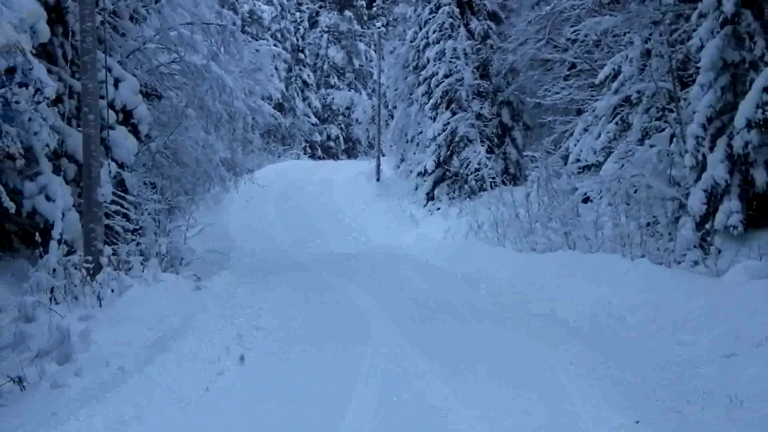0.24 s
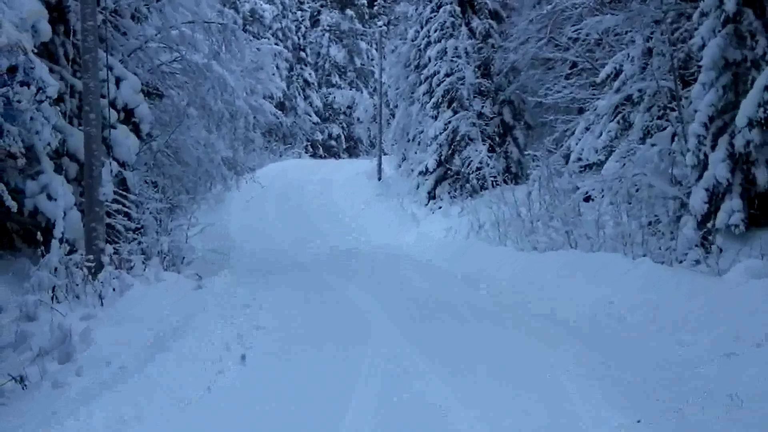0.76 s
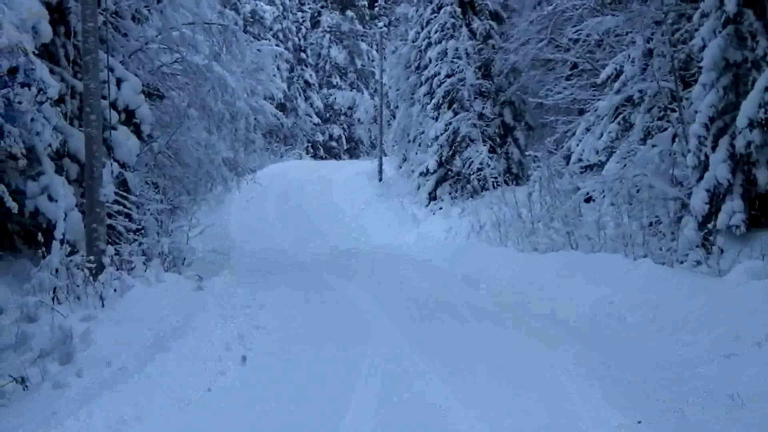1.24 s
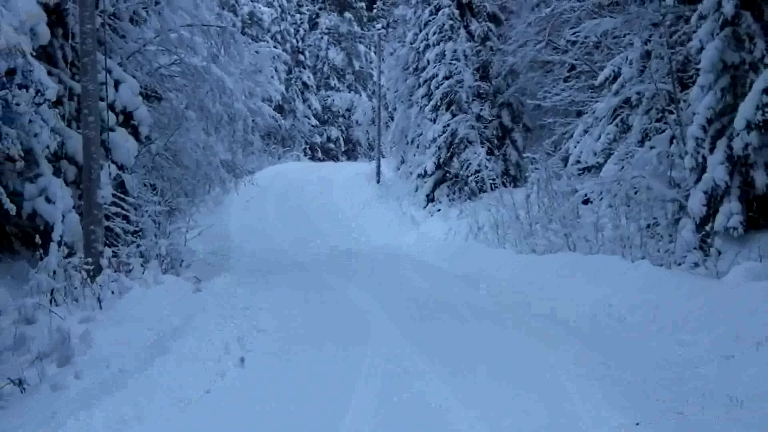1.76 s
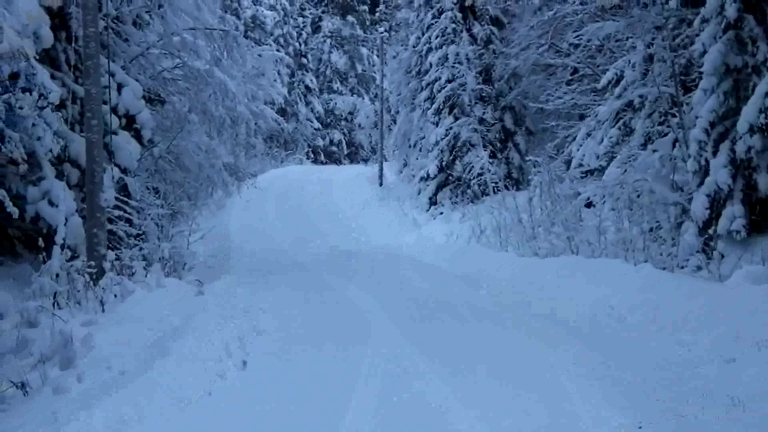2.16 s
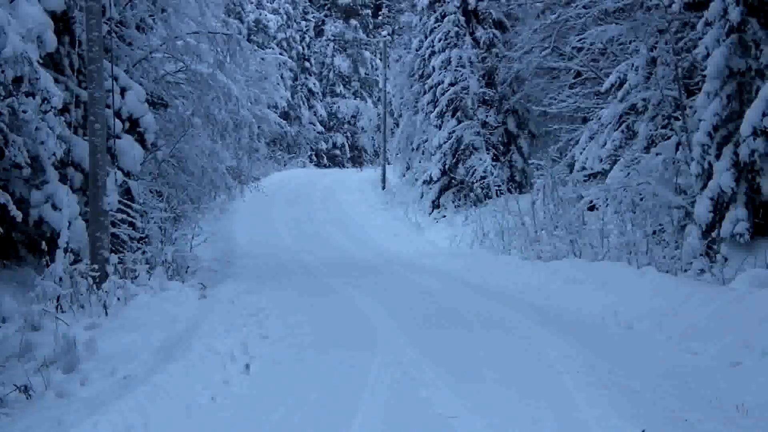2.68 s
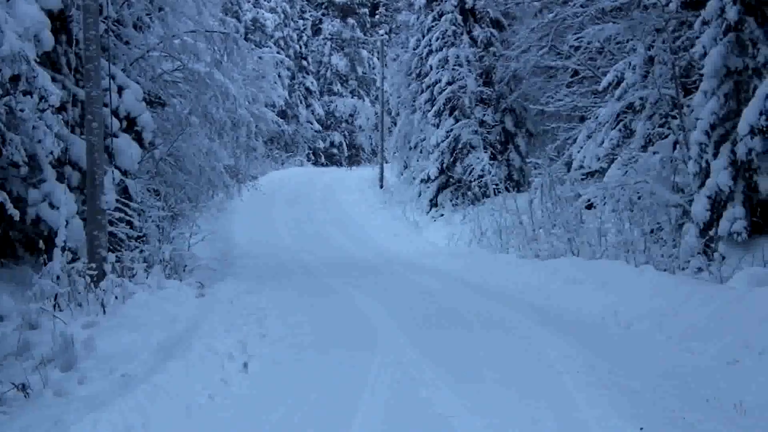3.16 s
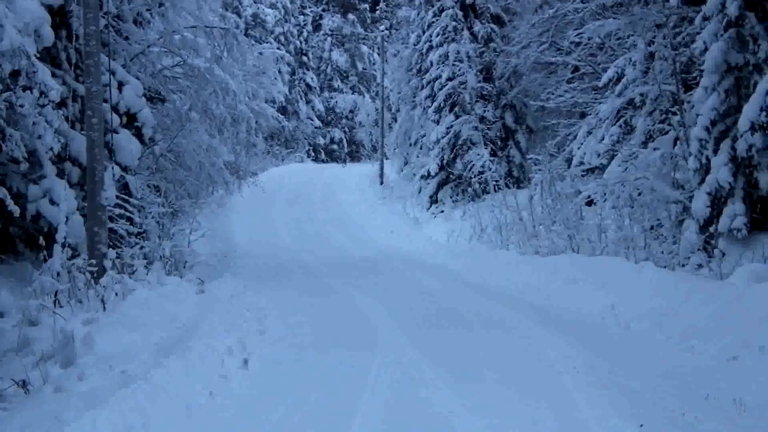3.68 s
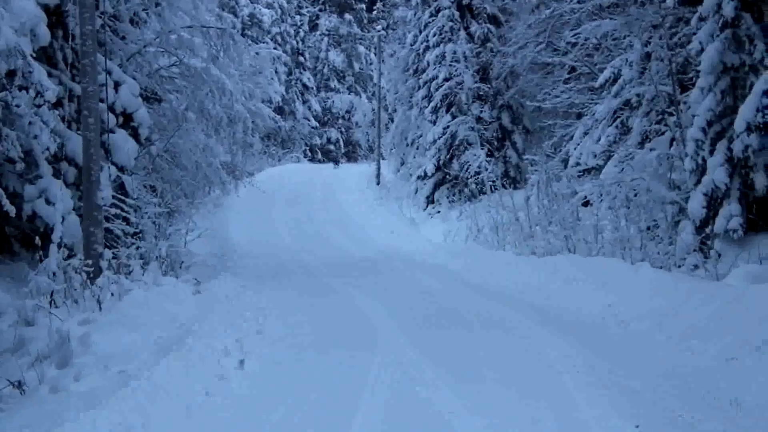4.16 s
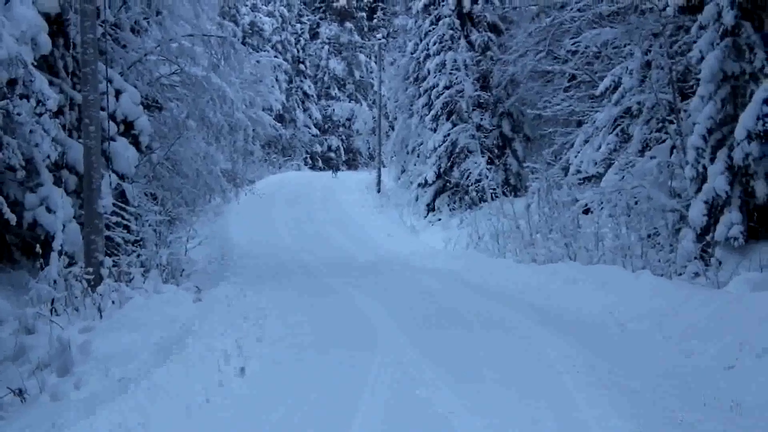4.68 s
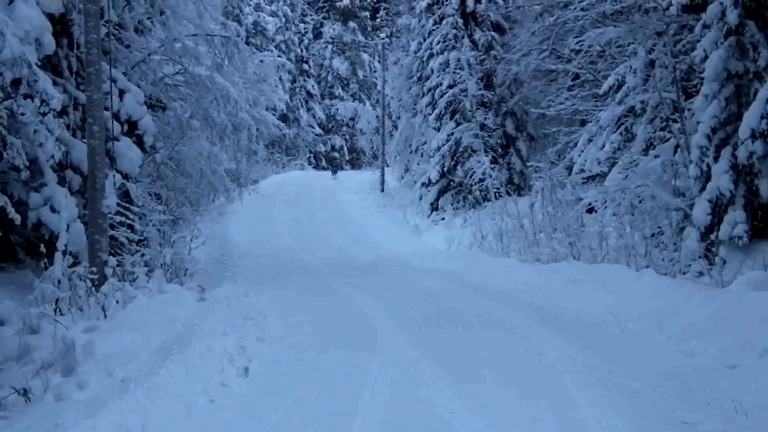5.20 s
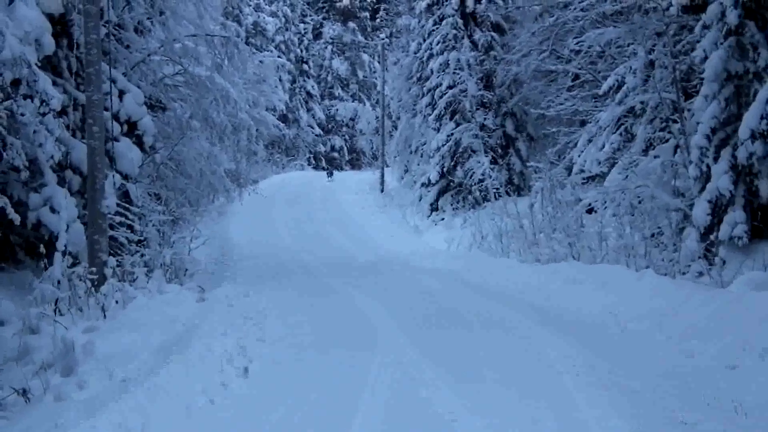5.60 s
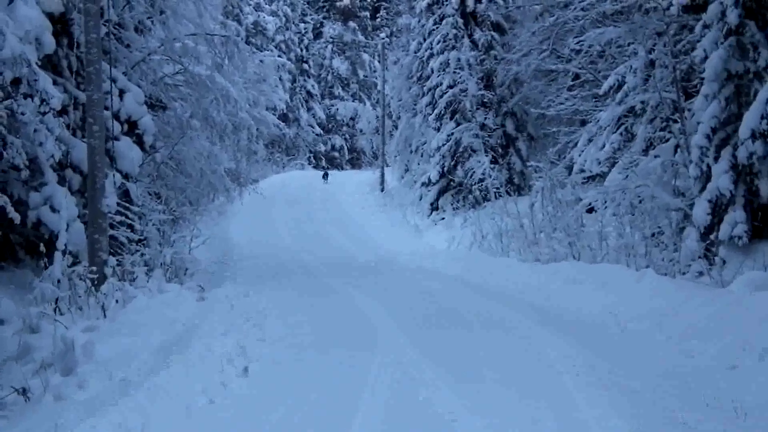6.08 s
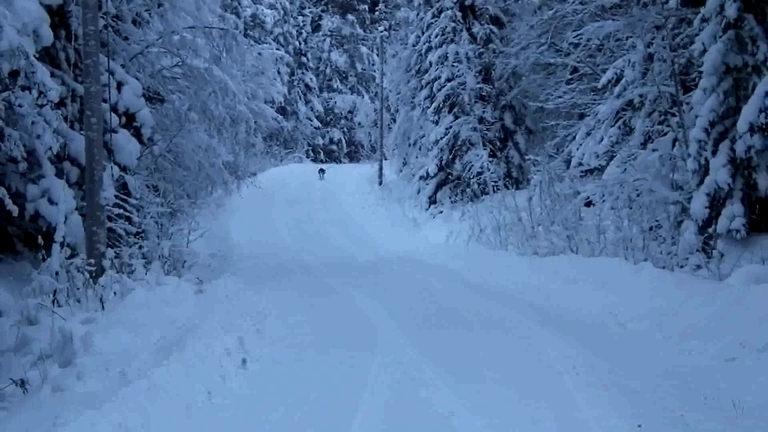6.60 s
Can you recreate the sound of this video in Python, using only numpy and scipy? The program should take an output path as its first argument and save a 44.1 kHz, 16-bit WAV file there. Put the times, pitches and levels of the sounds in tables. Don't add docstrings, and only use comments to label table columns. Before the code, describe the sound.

A running hound yelps high and short, roughly twice a second in clusters: five cries, a gap of over a second, three louder ones, then one at the end. Hoarse pants, throat clicks and faint nasal whistles fill in between. The snowy woods return only a short dull tail. Early wind buffets the left of the stereo camera microphone, fading to faint gusts over air noise, hiss, ticking and whirring.

```python
import sys
import numpy as np
from scipy import signal
from scipy.fft import rfft, irfft
from scipy.io import wavfile
from scipy.ndimage import uniform_filter1d

SR = 44100
rng = np.random.default_rng(int(sys.argv[2]) if len(sys.argv) > 2 else 0)


def master_out(mix):
    frames = np.transpose(np.atleast_2d(mix))
    ceiling = np.clip(frames, -1, 1)
    pcm = np.round(ceiling * 32767).astype(np.int16)
    wavfile.write(sys.argv[1], SR, pcm)


def linear_from_db(decibels):
    return 10 ** (np.asarray(decibels, float) / 20)


N = 301644
TIME = np.arange(N) / SR

# (frequency [Hz], density [dB per Hz])
AIR_SPECTRUM = [(12, -31), (20, 5.5), (123, -9.5), (334, -5.5), (461, -8), (654, -6), (950, -8.5),
                (1530, -10), (1640, -10.5), (1860, -6.5), (2110, -11), (6000, -12), (7700, -22.5),
                (10000, -53), (16900, -120)]
# (frequency [Hz], density [dB per Hz])
HISS_SPECTRUM = [(7500, -41), (8100, -28), (8400, 12.5), (8700, -5), (9100, -4), (9600, -4), (10300, 3.5),
                 (11000, -1.5), (11600, -12), (12100, -5), (15300, 1)]
# (time [s], gain [dB])
CAMERA_GAIN = [(0, 5.5), (.66, 3.5), (3.6, 1.77), (6.84, 0.8)]
# (start [s], length [s], level [dB])
DRONE_PASS = (3.584, 0.63, -54.5)
WHIR_STARTS = [0.059, 1.06, 2.06, 3.059, 5.06, 6.06]
# (from [Hz], to [Hz])
EMPTY_BANDS = [(7730, 8050), (8680, 8970), (11690, 11780), (15170, 22050)]

# (frequency [Hz], density [dB per Hz])
GUST_SPECTRUM = [(25, -14), (50, -1), (85, 0), (150, -7), (250, -19), (450, -30), (600, -60)]
# (start [s], length [s], level [dB], left minus right [dB])
GUST_EVENTS = [(-.1, 0.38, -31, 39), (0.255, 0.11, -33, 36), (0.356, 0.24, -26, 27),
               (0.623, 0.034, -28.5, 30), (0.906, 0.035, -34, 29), (1.602, 0.23, -55, 29),
               (2.295, 0.2, -45.5, 9), (2.472, 0.38, -40.5, 17), (3.562, 0.089, -46, 20),
               (4.367, 0.43, -51.5, 19), (4.8, 0.38, -43, 24), (5.163, 0.33, -44.5, 16),
               (5.426, 0.32, -46, 5), (5.837, 0.1, -53, 24), (5.997, 0.38, -45, -22),
               (6.656, 0.32, -71, -4)]
# (time [s], level [dB])
BREEZE = [(0, -27.5), (.7, -49), (2.9, -60.5), (3.4, -85), (6.3, -65), (6.55, -83), (6.84, -86)]
# (time [s], peak [dB], frequency [Hz])
EDDIES = [(0.019, -17, 68), (0.04, -18.5, 151), (0.063, -18.5, 176), (0.075, -12.5, 126), (0.124, -16, 93),
          (0.142, -16, 28), (0.192, -14, 108), (0.206, -21, 90), (0.282, -17, 92), (0.29, -43, 138),
          (0.309, -9.5, 71), (0.386, -24, 113), (0.411, -13, 119), (0.417, -27, 126), (0.465, -24, 149),
          (0.508, -20, 81), (0.543, -11.5, 118), (0.569, -14, 80), (0.923, -21, 30), (2.533, -24.5, 45),
          (2.541, -28, 256), (2.609, -30, 69), (2.63, -22.5, 92), (2.641, -20, 57), (2.672, -25, 50),
          (2.713, -34, 59), (2.727, -36, 85), (2.737, -37, 131), (2.781, -27, 64), (2.797, -33, 70),
          (4.867, -22.5, 83), (5.037, -29, 62), (5.32, -29, 71), (5.602, -34, 106), (5.904, -28, 111)]

# (frequency [Hz], width [Hz], level [dB])
THROAT_MODES = [(850, 150, -3.5), (1620, 390, 13), (2000, 2030, 1)]
# (frequency [Hz], width [Hz], level [dB])
MUZZLE_MODES = [(4190, 930, 1.5), (6760, 850, -2)]
# (time [s], frequency [Hz], peak
# [dB], length [s])
SHORT_TONES = [(0.679, 1440, -9.5, 0.0047), (0.755, 1600, -36, .02), (0.83, 1610, -45, 0.019),
               (0.874, 1620, -50, 0.036), (1.209, 2052, -19.5, 0.0048), (1.214, 2070, -20, 0.0076),
               (2.66, 1450, -20, 0.021), (2.671, 1418, -7.5, 0.012), (2.672, 2780, -35, .008),
               (2.083, 4760, -32, .012), (2.093, 4800, -34, .01), (4.211, 990, -20, 0.0099),
               (2.733, 1430, -32.5, 0.018), (4.19, 4220, -27, .014), (4.666, 2150, -23.5, .014),
               (4.773, 4450, -27.5, 0.014), (6.22, 850, -43, .008), (6.27, 820, -45, 0.016),
               (0.683, 2200, -22.5, 0.0058), (0.69, 1600, -18.5, 0.016), (0.702, 1620, -21, 0.014),
               (0.733, 1620, -27.5, 0.021), (1.612, 998, -15, 0.024), (1.488, 1710, -24, 0.0047),
               (2.108, 1183, -17, 0.0024), (2.119, 1900, -22, 0.0029), (2.130, 1700, -34, 0.0032),
               (2.684, 1490, -22, 0.011), (5.334, 2050, -22, .006), (5.345, 2300, -27, .012),
               (5.355, 2400, -29, .01), (5.368, 2450, -33, .012), (5.379, 2400, -34, .01),
               (5.378, 1750, -33, .01), (6.226, 1500, -32, .005), (6.231, 900, -32, .004),
               (5.365, 3600, -34, .008), (6.198, 3620, -33, .006), (6.203, 6100, -42, .006),
               (6.212, 1300, -34, .003), (6.220, 1450, -25, .004), (6.23, 1400, -48, 0.0051),
               (6.265, 1170, -32, 0.0024), (6.784, 1600, -16, 0.0082), (6.789, 1723, -13, .006)]
RASP_STARTS = [.685, 1.296, 1.615, 2.1, 2.678, 4.195, 4.782, 5.327, 5.4, 5.705, 6.208, 6.259, 6.315, 6.785,
               5.74, 5.835]
# (length [s], level [dB], mouth [Hz], brightness [dB])
RASP_BREATHS = [(0.066, -38.5, 750, -12), (0.067, -33.5, 800, -24), (0.049, -32, 470, -22),
                (0.055, -35.5, 664, -13), (0.08, -34.5, 510, -21), (0.075, -29, 900, -12.5),
                (0.048, -29.5, 810, -10), (0.06, -28.5, 1650, -13), (0.049, -40, 1620, -20),
                (0.14, -40.5, 1550, -15.5), (0.054, -44, 370, -3.5), (0.036, -48, 600, -7),
                (0.077, -43, 470, -5.5), (0.093, -27, 1480, -14), (0.048, -41.5, 2000, -16),
                (0.015, -43, 1500, -21)]
# (start [s], length [s], from [Hz], to [Hz], level [dB])
NOSE_WHISTLES = [(3.219, .026, 6340, 5800, -61), (4.04, 0.034, 3310, 4720, -53.5),
                 (4.328, 0.062, 2850, 2710, -62.5), (4.617, 0.02, 3580, 4700, -52.5),
                 (5.1, 0.065, 2980, 3140, -61), (5.192, 0.021, 3630, 5030, -50),
                 (6.141, 0.025, 2820, 3590, -50.5), (6.157, 0.024, 3800, 4100, -59),
                 (6.185, 0.0096, 3720, 3664, -54), (6.579, 0.03, 3120, 2920, -58),
                 (6.613, 0.022, 3100, 3170, -55), (6.645, 0.0085, 3140, 3450, -51.5),
                 (6.659, 0.011, 3880, 4150, -51.5), (5.673, 0.022, 6220, 5280, -60)]

# (time [s], pitch [Hz], effort [dB])
CRY_CURVES = [
    [(.61, 1659, -45), (.618, 1634, -23.5), (.629, 1584, -33), (.645, 1583, -21), (.667, 1675, -17),
     (.676, 1600, -20), (.685, 1137, -28.5), (.695, 850, -46), (.708, 650, -40)],
    [(1.202, 2181, -33), (1.217, 1730, -27.5), (1.232, 1500, -19), (1.261, 1433, -13.5),
     (1.269, 1507, -20.5), (1.278, 1420, -30.5), (1.297, 1425, -38), (1.304, 850, -27), (1.315, 720, -32.5)],
    [(1.464, 561, -34.5), (1.495, 910, -33), (1.501, 1004, -19), (1.52, 1102, -14.5), (1.541, 1063, -12),
     (1.547, 1068, -28.5), (1.57, 1235, -26), (1.6, 1170, -37.5), (1.618, 813, -25.5)],
    [(1.994, 2058, -44), (2.002, 1707, -25), (2.014, 1485, -30), (2.036, 1350, -21), (2.054, 1403, -30.5),
     (2.072, 1464, -22), (2.079, 1559, -34), (2.1, 1345, -35.5), (2.118, 750, -33.5)],
    [(2.573, 2250, -48), (2.582, 1850, -23.5), (2.593, 1600, -27.5), (2.612, 1529, -18), (2.629, 1531, -16),
     (2.645, 1649, -31), (2.666, 1781, -38), (2.686, 793, -25), (2.696, 659, -80)],
    [(4.091, 1780, -31), (4.099, 1530, -18), (4.11, 1420, -15.5), (4.124, 1397, -17.5), (4.171, 1412, -6.5),
     (4.182, 1435, -9.5), (4.19, 1320, -25), (4.2, 960, -20), (4.205, 940, -40)],
    [(4.65, 918, -25), (4.668, 1086, -35), (4.677, 1243, -23), (4.701, 1259, -15), (4.709, 1294, -18),
     (4.713, 1421, -16), (4.763, 1487, -20.5), (4.777, 1092, -25.5), (4.788, 660, -32.5)],
    [(5.229, 2336, -34), (5.238, 1971, -19.5), (5.257, 1628, -22.5), (5.279, 1528, -18.5),
     (5.295, 1562, -16), (5.309, 1601, -18), (5.323, 1503, -25.5), (5.333, 964, -27), (5.346, 589.3, -28.5)],
    [(6.682, 2352, -34), (6.694, 1960, -16.5), (6.705, 1771, -19), (6.728, 1604, -17.5),
     (6.76, 1574, -18.5), (6.77, 1695, -30), (6.781, 1467, -29), (6.79, 984, -24.5), (6.799, 635, -28.5)],]
# (from [s], 2nd partial [dB], 3rd partial [dB], harshness held [dB], harshness at the catch [dB])
FOLD_SETTINGS = [(0, -9, -22, -29.5, -12), (.655, -26, -29.5, -30, -22.5), (.683, -7.5, -26, -24.5, -24),
                 (1.1, -0.5, -27, -25, -13), (1.272, -6.5, -22.5, -12, -14), (1.4, 10, -34, -13.5, -13),
                 (1.5, 1.5, -30.5, -31, -24), (1.548, 5, -27.5, -23.5, -26), (1.9, -2.5, -20.5, -22, -9),
                 (2.4, -9.5, -17.5, -23.5, -4.5), (4, -5.5, -14.5, -38, -13), (4.188, -1, -14, -26, -18),
                 (4.5, 10, -16, -33, -24), (4.709, -18, -16.5, -25.5, -22), (4.771, 10, -6, -22.5, -22),
                 (5.1, -2, -16, -19.5, -10), (6.5, -1, -19.5, -21, -32)]
# (from [s], partials above the 3rd [dB], haze [dB])
TOP_BREATH = [(0, -10, -18), (1.1, -12, -2), (1.4, -2, -20), (1.9, -9, -2), (2.4, -12, -18), (4, -8, -13),
              (4.5, 0, -13), (5.1, -10, -1), (6.5, 1, -1)]
# (frequency [Hz], lift [dB])
MOUTH_LIFT = [(1200, -7), (1700, -4.5), (2100, 1.5), (2500, -15), (2900, -13), (4400, -22.5)]
# (frequency [Hz], lift [dB])
MUZZLE_LIFT = [(2500, 8), (4200, -4), (5000, -2.5), (5700, -9), (6400, -6), (7600, -16.5)]
# (time [s], level [dB], length [s])
THROAT_GULPS = [(1.293, -19, .012), (2.073, -24, 0.0074), (2.086, -19.5, 0.0045), (2.092, -14, 0.006),
                (2.097, -24, 0.0081), (5.245, -22, 0.0044), (5.322, -14.5, 0.0041), (6.695, -24.5, 0.0026),
                (6.7, -20, .005), (6.775, -15, 0.0053), (6.779, -16.5, 0.006)]
# (start [s], length [s], rate [beats per s], depth [0-1])
FOLD_FLUTTERS = [(1.205, 0.018, 290, 0.97), (1.981, 0.021, 61, 0.9), (2.654, 0.025, 150, 0.1),
                 (4.06, 0.032, 490, 0.3), (4.708, 0.03, 98, 0), (5.212, 0.042, 330, 1),
                 (6.675, 0.044, 264, 0.45), (1.52, 0.011, 60, 0.26)]
# (start [s], length [s], multiple of the
# pitch, level [dB])
EXTRA_LINES = [(1.265, 0.03, 3.3, -42), (2.05, 0.033, 3.3, -46), (4.115, 0.073, .7, -53),
               (2.575, .012, 2, -44), (2.038, .04, 2, -32.5), (2.088, 0.014, 2, -39),
               (5.259, .05, 3, -34), (5.23, .012, 1.9, -39), (6.684, .02, 2, -39), (6.71, 0.11, 4, -51),
               (6.71, 0.11, 2, -51), (4.738, 0.024, 1.55, -35), (2.04, 0.041, 3.9, -52),
               (2.02, 0.061, .67, -42.5), (2.606, 0.04, .62, -47), (4.108, 0.047, 1.5, -40),
               (4.09, 0.011, 1.4, -33.5), (4.098, 0.015, 4, -49.5), (4.09, .01, 2.6, -39.5),
               (4, 0.026, 1.5, -22), (2.64, 0.038, 2, -44.5), (2.593, .018, 4, -52.5),
               (1.518, .028, 4, -52), (1.584, 0.09, 2, -30), (4.6, 0.11, 3.5, -41),
               (6.73, 0.065, 3.4, -43.5), (6.684, 0.0088, .8, -30), (5.231, 0.01, .74, -32),
               (1.205, 0.014, .8, -32), (1.553, 0.039, 1.72, -42), (1.56, 0.043, 4, -50.5),
               (1.212, 0.037, 3.1, -46)]


def rms_one(x):
    return x / np.sqrt(np.mean(x ** 2) + 1e-20)


def in_time(rows):
    s, *columns = np.transpose(rows)
    return [np.interp(TIME, s, c) for c in columns]


def held(rows):
    s, *columns = np.transpose(rows)
    row = np.maximum(np.searchsorted(s, TIME) - 1, 0)
    return [uniform_filter1d(c[row], size=100) for c in columns]


def swell(start, length, rise):
    out = np.zeros(N)
    span = slice(max(int(start * SR), 0), int((start + length) * SR))
    corners = [start, start + rise * length, start + length]
    out[span] = np.interp(TIME[span], corners, [0, 1, 0]) ** 0.36
    return out


def noise():
    return rng.standard_normal(N)


def coloured(spectrum, count):
    hz = np.arange(1, N // 2 + 2) * SR / N
    at, level_db = np.transpose(spectrum)
    gain = linear_from_db(np.interp(np.log(hz), np.log(at), level_db, left=-120, right=-120))
    return rms_one(irfft(rfft(rng.standard_normal((count, N))) * gain, N))


def drift(rate):
    return rms_one(signal.sosfilt(signal.butter(2, rate, fs=SR, output="sos"), noise()))


def resonate(x, modes):
    out = 0
    for k, (hz, width, level_db) in enumerate(modes):
        r = np.exp(-np.pi * width / SR)
        poles = [2, -4 * r * np.cos(2 * np.pi * hz / SR), 2 * r * r]
        out = out + (-1) ** k * linear_from_db(level_db) * signal.lfilter([1 - r * r, 0, r * r - 1], poles, x)
    return out


def still_air():
    gain_db, = in_time(CAMERA_GAIN)
    air_db = -46 + gain_db
    mid, side = coloured(AIR_SPECTRUM, count=2)
    air = linear_from_db(air_db) * (mid + linear_from_db(-0.5) * side * [[1], [-1]]) / np.sqrt(2)
    twigs = linear_from_db(air_db - 15.5) * rms_one(resonate(noise(), [(2290, 71, 0)]))
    start, length, drone_db = DRONE_PASS
    droning = linear_from_db(-56.5 + gain_db) + linear_from_db(drone_db) * swell(start, length, rise=0.41)
    hum = droning * rms_one(resonate(noise(), [(264, 186, 0)]))
    return air + twigs + hum


def camera():
    tick_hz, tick_db, tick_s = 11970, -51.5, 0.015
    first_tick_s, tick_every_s = -.0214, .25039
    gain_db, = in_time(CAMERA_GAIN)
    follow_db = 1.13 * gain_db
    hiss = linear_from_db(-58.5 + follow_db) * coloured(HISS_SPECTRUM, count=2)
    ticking = uniform_filter1d(((TIME - first_tick_s) % tick_every_s < tick_s) * 1., size=40)
    ticks = linear_from_db(tick_db + .5 * follow_db) * ticking * np.sin(2 * np.pi * tick_hz * TIME)
    running = linear_from_db(-57 - 0.45 * TIME) * sum(swell(s, 0.23, rise=0.43) for s in WHIR_STARTS)
    whir = running * rms_one(resonate(noise(), [(10370, 380, 0)]))
    return hiss + ticks + whir


def gusting():
    powers = np.array([linear_from_db(2 * level_db) * swell(s, length, rise=0.4) ** 2.86
                       for s, length, level_db, _ in GUST_EVENTS])
    total = linear_from_db(2 * in_time(BREEZE)[0]) + powers.sum(axis=0)
    pan_db = np.array(GUST_EVENTS)[:, -1] @ powers / total
    return 10 * np.log10(total), pan_db


def wind():
    level_db, pan_db = gusting()
    share = np.sqrt(1 / (1 + linear_from_db(-2 * np.array([pan_db, -pan_db]))))
    puffs = coloured(GUST_SPECTRUM, count=2) * linear_from_db(2.5 * np.array([drift(20), drift(20)]))
    lopsided = np.exp(.2 * puffs) - 1
    puffs = signal.sosfilt(signal.butter(2, 28, "high", fs=SR, output="sos"), lopsided)
    rumble = coloured([(12, -20), (22, 0), (38, 0), (60, -25)], count=2)
    return share * (linear_from_db(level_db + 5.0) * puffs / 0.32 + linear_from_db(0.63 * level_db - 14.5) * rumble)


def thumps():
    out = np.zeros((2, N))
    for s, level_db, hz in EDDIES:
        span = slice(max(int((s - .04) * SR), 0), int((s + .04) * SR))
        u = (3.5 * np.clip(hz, 60, 150) * (TIME[span] - s)) ** 2
        out[0, span] += linear_from_db(level_db - 3.5) * (1 - 2 * u) * np.exp(-u)
    return out


def forest(x):
    near_t60_s, far_t60_s, far_db = .45, 1.2, -13
    build_up_s, snow_cut_hz = .06, 1700
    t = TIME[:SR]
    hits = rng.random((3, SR)) < 2500 / SR
    sparse = hits * rng.standard_normal((3, SR)) * (t > .015)
    fading = linear_from_db(-60 * t / near_t60_s) + linear_from_db(far_db) * linear_from_db(-60 * t / far_t60_s)
    shaped = sparse * fading * np.minimum(t / build_up_s, 1)
    echoes = signal.lfilter(*signal.butter(5, snow_cut_hz, fs=SR), shaped)
    pair = echoes[0] + 2.0 * echoes[1:]
    tail = signal.fftconvolve(x[None], pair / np.sqrt(np.sum(pair ** 2) / 2), axes=1)[:, :N]
    return tail * linear_from_db(2.4 * drift(30))


def pops():
    out = np.zeros(N)
    for s, hz, level_db, length in SHORT_TONES:
        span = slice(int((s - length / 2) * SR), int((s + length / 2) * SR))
        t = TIME[span] - s
        out[span] += linear_from_db(level_db) * np.cos(np.pi * t / length) ** 2 * np.sin(2 * np.pi * hz * t)
    return out


def rasps():
    fade, stretch = 4.1, 1.34
    out, air = 0, noise()
    flap = np.cos(2 * np.pi * np.cumsum(260 * (1 + 0.27 * drift(59.6))) / SR)
    for s, (length, level_db, mouth_hz, bright_db) in zip(RASP_STARTS, RASP_BREATHS):
        puff = air * swell(s, stretch * length, rise=0.095) ** fade * linear_from_db(level_db + 11.5) + 1e-18
        mouth = [(mouth_hz, 600, 1.5), (2700, 1100, -7), (620, 300, 1)]
        chopped = puff * (.75 + np.maximum(flap, 0) ** 2)
        body = resonate(resonate(chopped, mouth), [(1600, 1360, -.1)])
        bright = linear_from_db(bright_db) * resonate(resonate(puff, MUZZLE_MODES), MUZZLE_MODES)
        out = out + body + bright
    return out


def whistles():
    out = np.zeros(N)
    for s, length, from_hz, to_hz, level_db in NOSE_WHISTLES:
        span = slice(int(s * SR), int((s + length) * SR))
        glide = np.clip((TIME[span] - s) / length, 0, 1) ** 1.6
        pitch = from_hz + (to_hz - from_hz) * glide
        phase = 2 * np.pi * np.cumsum(pitch) / SR
        octave_gain = linear_from_db(3.0 + 2.9 * (level_db + 48.5)) * np.clip((3800 - pitch) / 200, 0, 1)
        tone = np.sin(phase) + octave_gain * np.sin(2 * phase)
        out[span] += linear_from_db(level_db + 13.5) * swell(s, length, rise=.85)[span] * tone
    return out


def phrases(tables, fade_s):
    gate = sum((TIME >= rows[0][0]) & (TIME < rows[-1][0]) for rows in tables) > 0
    columns = in_time(sorted(row for rows in tables for row in rows))
    return columns, uniform_filter1d(gate * 1., size=int(fade_s * SR))


def voicing(tables, pitch, effort):
    catch_s, drop_s, drop_harsh_db = 0.019, 0.023, -11
    catch_dull_db, drop_dull_db = -16, -20
    second_db, third_db, steady_db, catch_db = held(FOLD_SETTINGS)
    lift_db = np.interp(2 * pitch, *np.transpose(MOUTH_LIFT))
    gulps = sum(linear_from_db(level_db) * np.sqrt(2) * swell(s - length / 2, length, rise=.5) ** 2
                for s, level_db, length in THROAT_GULPS)
    starts, ends = [rows[0][0] for rows in tables], [rows[-1][0] for rows in tables]
    catch = sum(np.interp(TIME, [s - .01, s, s + catch_s], [0, 1, 0]) for s in starts)
    drop = sum(np.interp(TIME, [s - drop_s, s, s + .01], [0, 1, 0]) for s in ends)
    harsh_db = steady_db + catch * (catch_db - steady_db) + drop * (drop_harsh_db - steady_db)
    leaving_db = drop_dull_db * np.clip(3 * drop, 0, 1)
    lift_db += leaving_db * np.clip((2 * pitch - 2150) / 400, 0, 1)
    second = effort * linear_from_db(second_db + lift_db + catch_dull_db * catch)
    third = effort * linear_from_db(third_db + catch_dull_db * catch + leaving_db)
    return effort + gulps, second, third, linear_from_db(np.minimum(harsh_db, 0))


def cries():
    tables = CRY_CURVES
    softened = [[(s, hz, linear_from_db(level_db / 2)) for s, hz, level_db in rows] for rows in tables]
    (pitch, root), gate = phrases(softened, fade_s=0.003)
    first, second, third, harsh = voicing(tables, pitch, np.sqrt(2) * root ** 2)
    top_db, haze_db = held(TOP_BREATH)
    phase = 2 * np.pi * np.cumsum(pitch * (1 + (.003 + .12 * harsh) * drift(300))) / SR

    fray = linear_from_db(2.5 * drift(90))
    heights = [first, second * np.sqrt(fray)]
    for k in range(3, 8):
        lift_db = np.interp(k * pitch, *np.transpose(MUZZLE_LIFT))
        if k > 3:
            lift_db = lift_db + top_db + 3.3 * drift(62)
        heights.append(third * fray * linear_from_db(lift_db))
    voice = 0
    for k, height in enumerate(heights, 1):
        voice = voice + height * np.sin(k * phase) * np.clip((7600 - k * pitch) / 300, 0, 1)

    air = noise() * (1 + np.cos(phase))
    low = linear_from_db(-1.5) * np.hypot(first, second) * rms_one(resonate(air, THROAT_MODES))
    haze = rms_one(resonate(resonate(air, MUZZLE_MODES), [(4360, 5000, 0)]))
    high = linear_from_db(haze_db - 4.5 + 2.0 * drift(60)) * third * haze
    teeth = linear_from_db(-27.5) * third * rms_one(resonate(air, [(9370, 2100, 0)]))
    between = sum(linear_from_db(level_db + 5) * swell(s, length, rise=0.2) * fray ** 1.3 * np.sin(multiple * phase)
                  for s, length, multiple, level_db in EXTRA_LINES)
    flutter = sum(depth * swell(s, length, rise=0.049) * np.cos(2 * np.pi * per_s * (TIME - s))
                  for s, length, per_s, depth in FOLD_FLUTTERS)
    shaken = voice * (1 + flutter + 1.2 * harsh * drift(170))
    return gate * (shaken + harsh * low + high + teeth + between)


def scene():
    hound = cries() + whistles() + rasps() + pops()
    direct = np.array([linear_from_db(-0.75) * hound, linear_from_db(2.0) * np.roll(hound, 1)])
    return direct + linear_from_db(-26) * forest(hound) + wind() + thumps() + still_air() + camera()


def top_cut(x):
    return signal.sosfilt(signal.butter(12, 15430, fs=SR, output="sos"), x)


def record(dry):
    hz = np.arange(N // 2 + 1) * SR / N
    kept = 1 - sum((hz > low) & (hz < high) for low, high in EMPTY_BANDS)
    kept = kept * np.where((hz > 7700) & (hz < 9300), linear_from_db(-11.5), 1)
    mix = irfft(rfft(dry) * kept, N)
    return top_cut(mix)


dry = scene()
out = record(dry)
master_out(out)
```